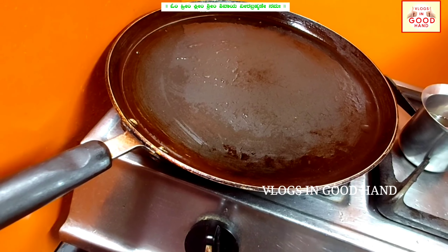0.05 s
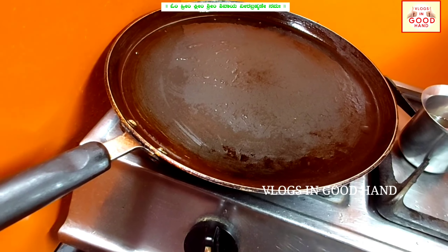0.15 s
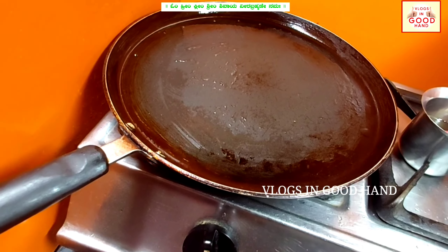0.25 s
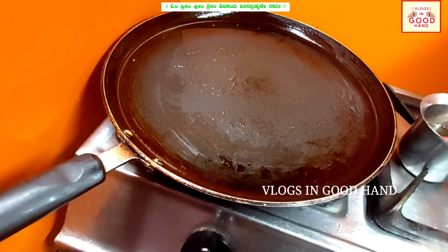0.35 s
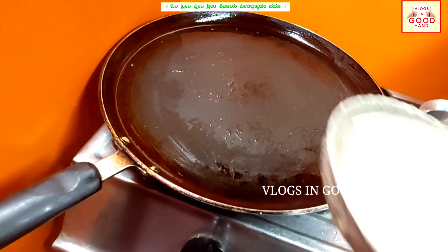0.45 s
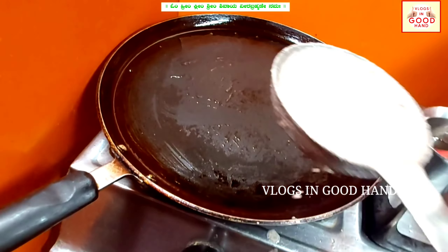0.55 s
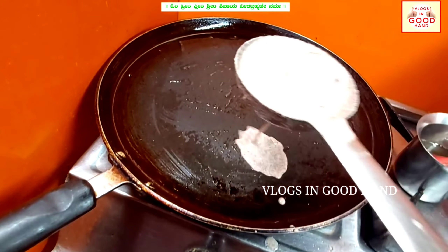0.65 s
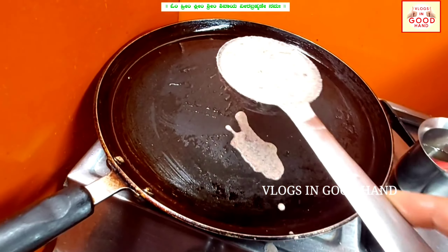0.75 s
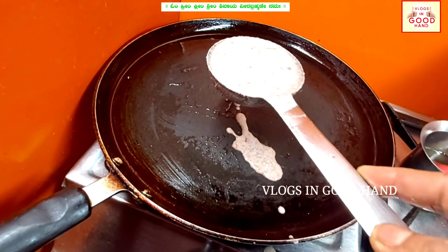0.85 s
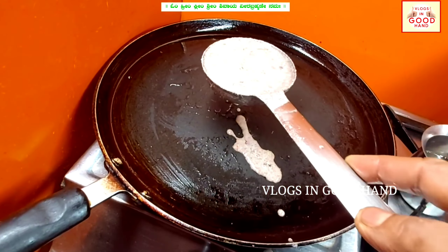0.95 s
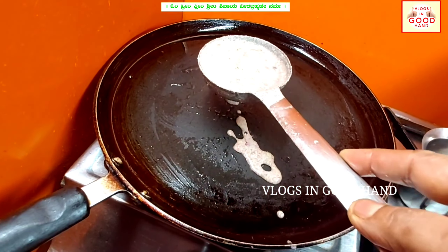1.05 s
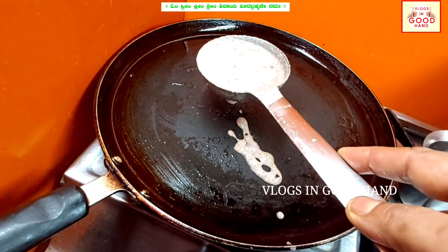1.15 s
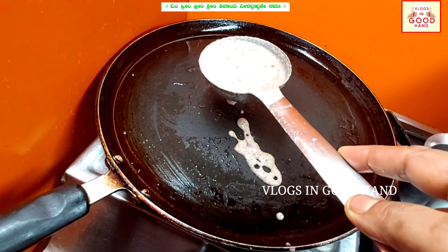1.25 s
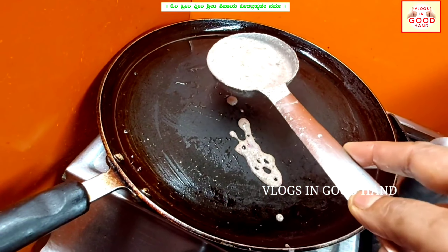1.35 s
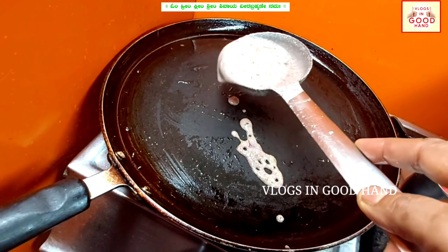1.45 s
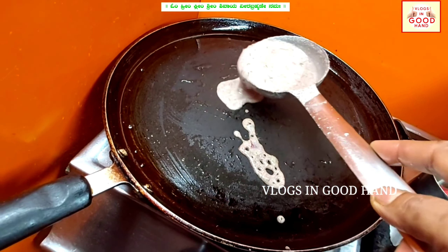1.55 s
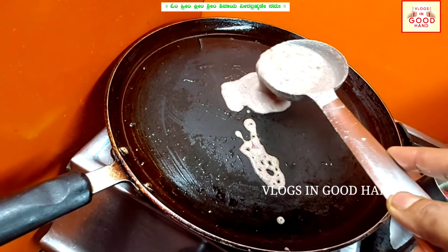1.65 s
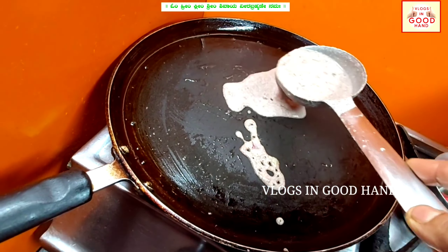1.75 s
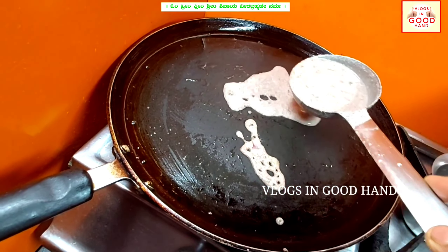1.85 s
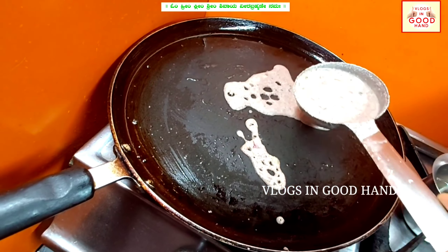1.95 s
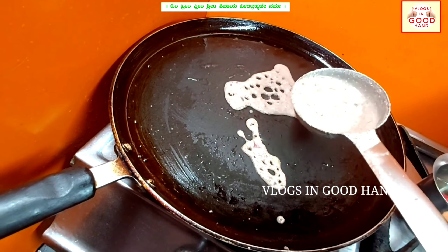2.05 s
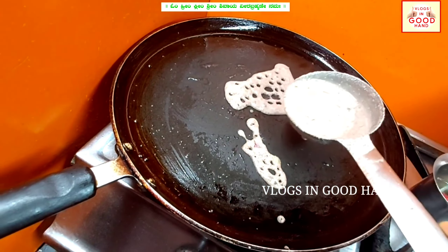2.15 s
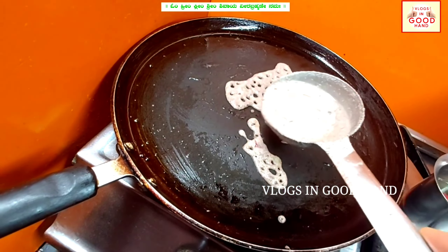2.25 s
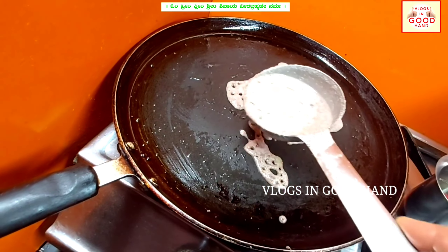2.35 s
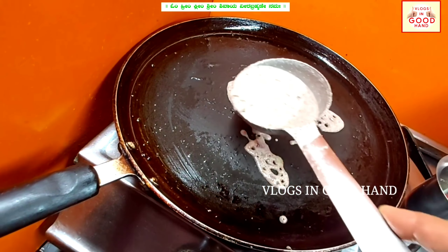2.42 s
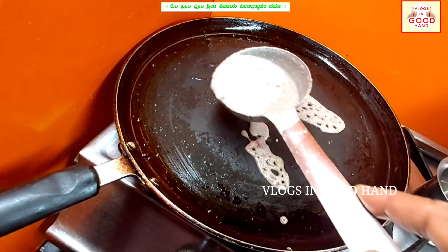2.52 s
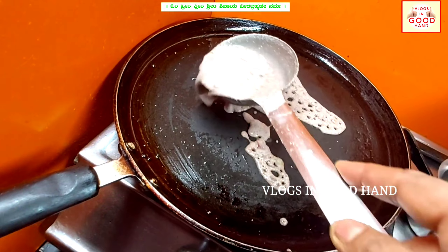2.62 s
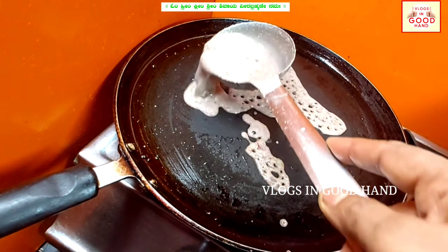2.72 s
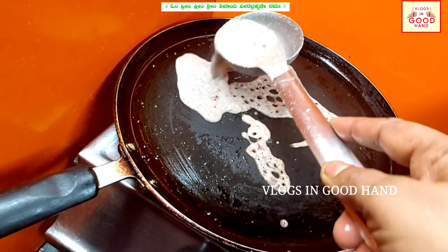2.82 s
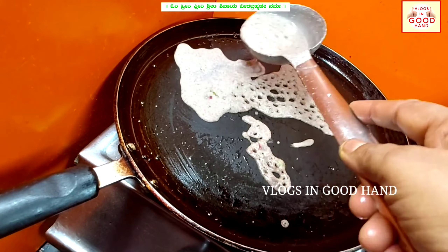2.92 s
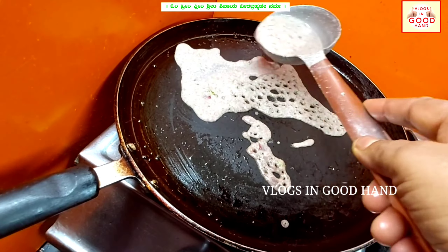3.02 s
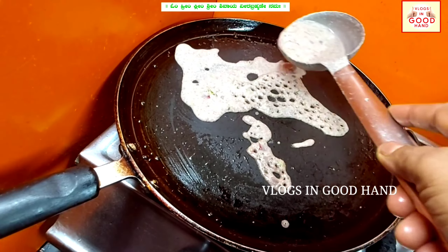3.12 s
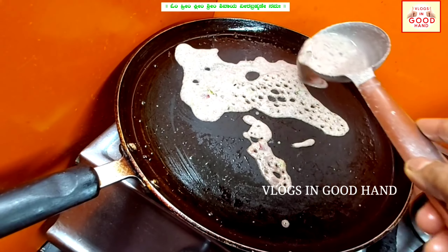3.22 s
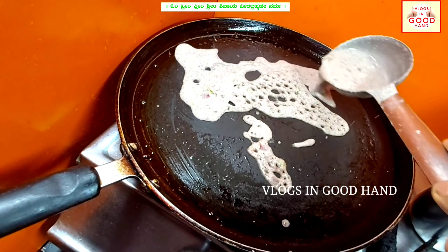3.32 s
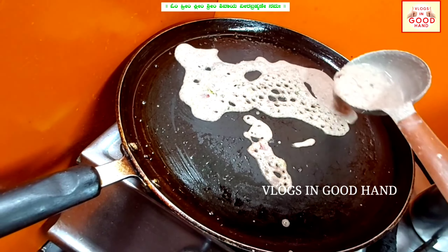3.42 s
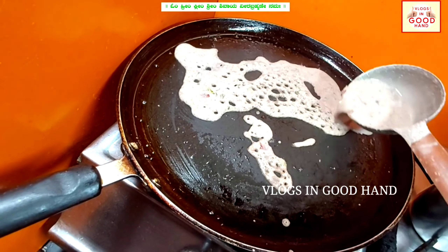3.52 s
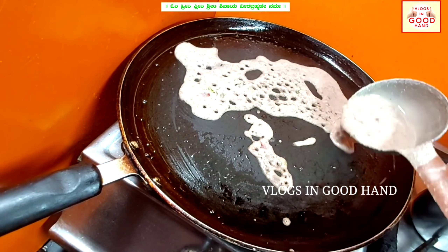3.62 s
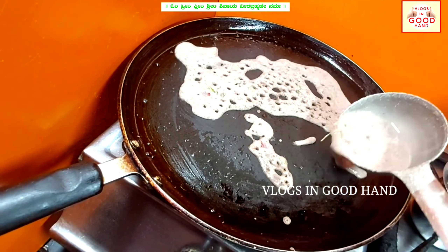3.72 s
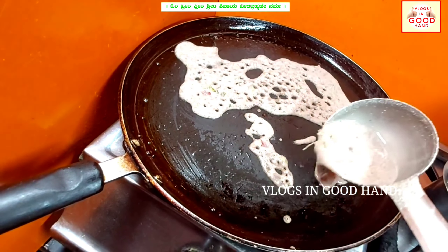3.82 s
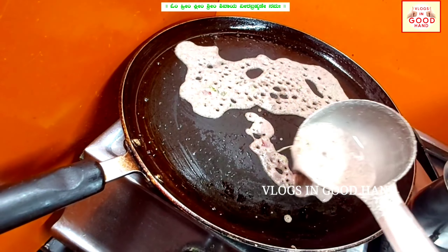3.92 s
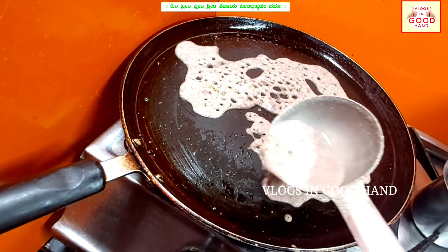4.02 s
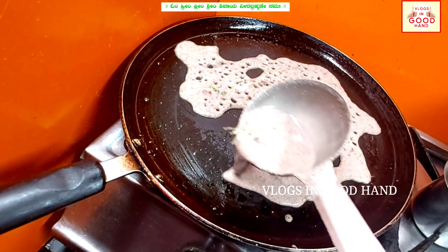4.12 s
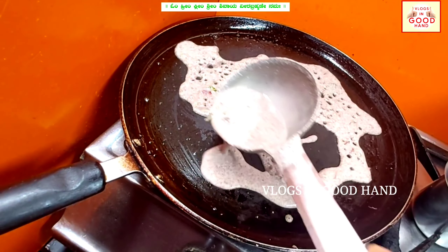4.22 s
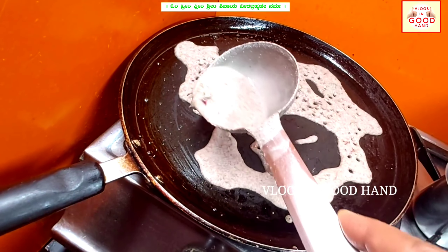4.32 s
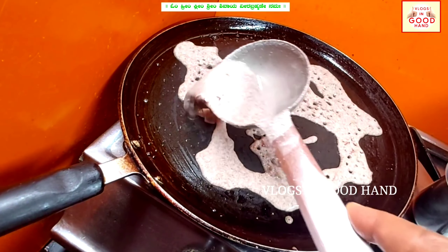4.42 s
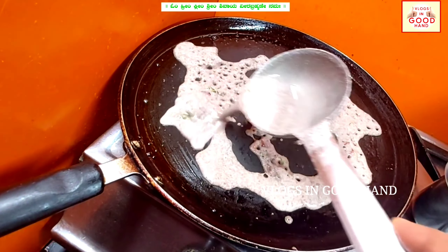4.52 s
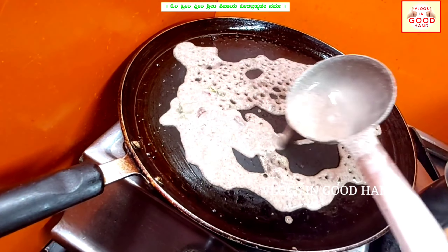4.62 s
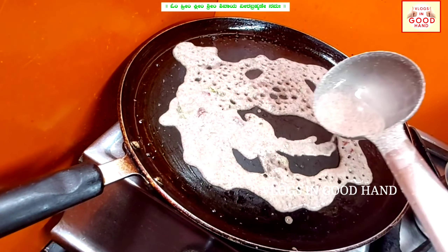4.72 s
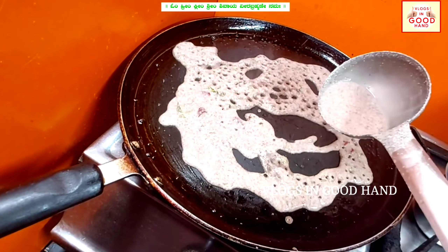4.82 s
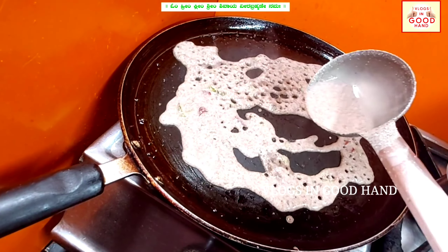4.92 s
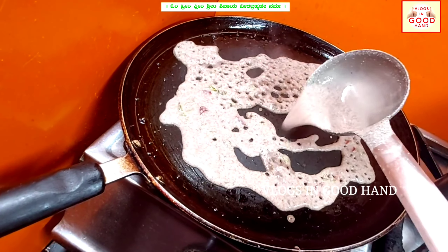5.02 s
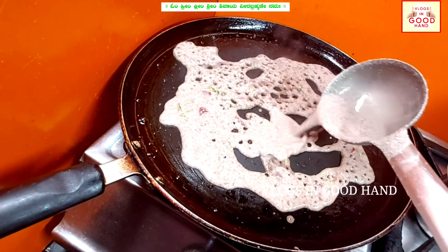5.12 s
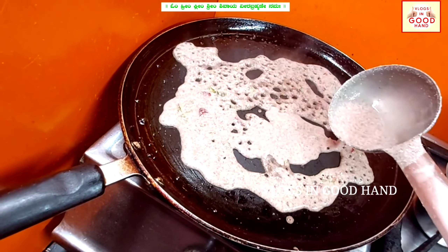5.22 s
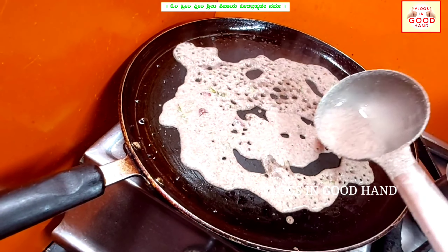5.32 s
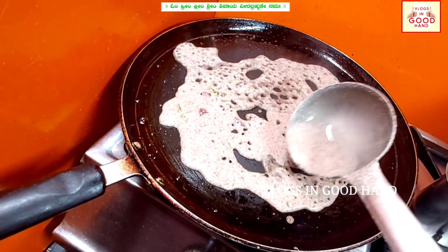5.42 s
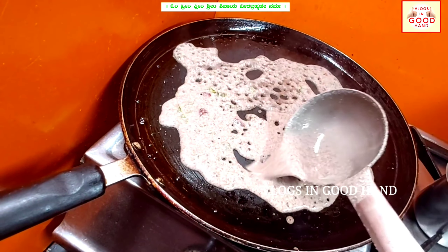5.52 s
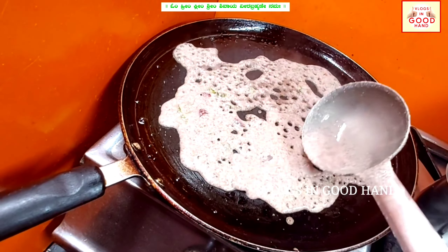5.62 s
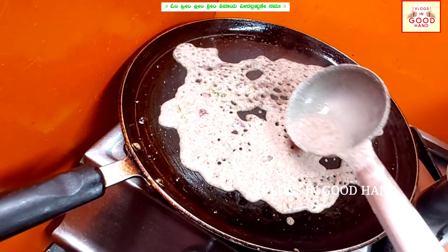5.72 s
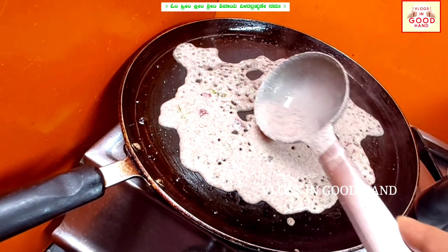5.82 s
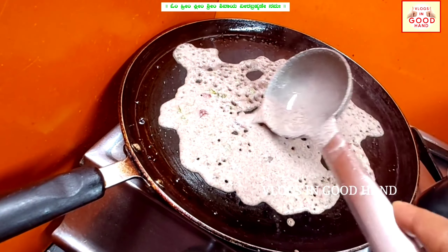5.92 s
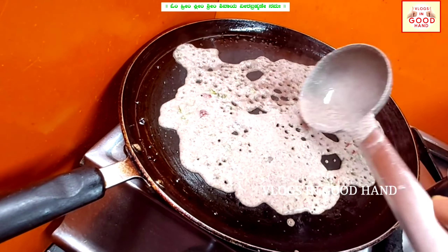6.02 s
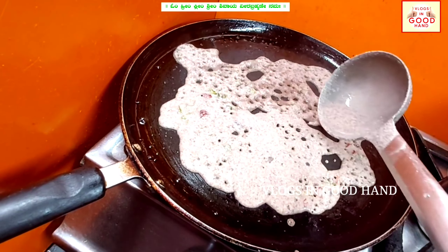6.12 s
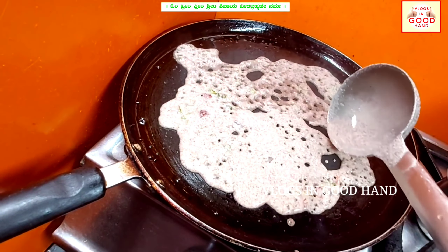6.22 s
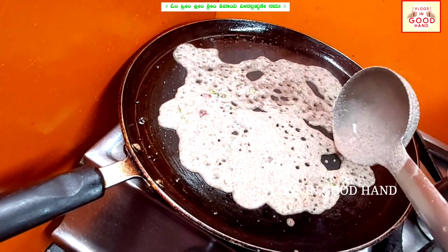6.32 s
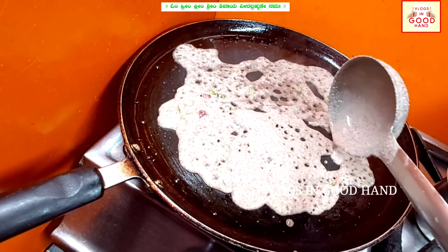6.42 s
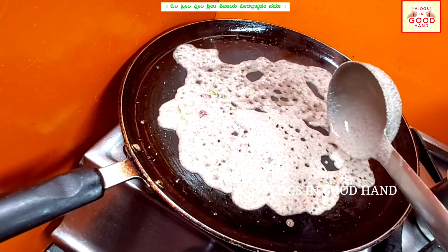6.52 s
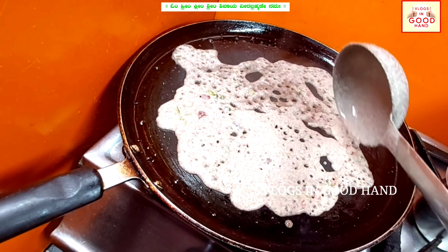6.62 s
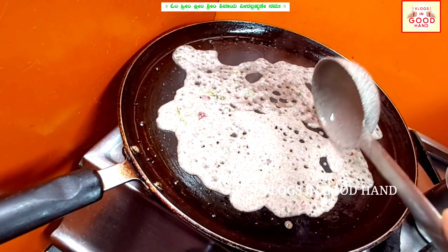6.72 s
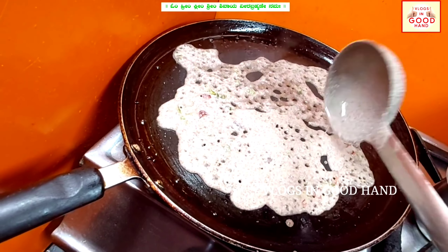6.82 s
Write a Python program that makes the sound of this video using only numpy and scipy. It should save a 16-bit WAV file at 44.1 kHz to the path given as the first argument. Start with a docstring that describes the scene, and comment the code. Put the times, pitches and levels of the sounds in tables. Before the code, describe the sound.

Close stereo frying sound in a small, quiet home kitchen. Near-silence first, then tiny drips tap the pan and batter sets off a sudden fierce sizzle. It eases and surges again as more is poured, with airy steam, fine crackling and faint wavering squeals from the metal. Soft thuddy pops and crisp treble ticks occur throughout. Later the boiling darkens and softens, but hissing and spitting continue to the end.

```python
"""Steam hisses from the pores of thin batter ladled onto a hot oiled griddle, near a two-port microphone.
The hiss is shaped noise in bursts; boiling adds a darkening band of noise, crackle and fuzzy pan whistles.
Fat spits as treble chirps; ultrasonic spits overload the microphone into short dull negative pops. Drips
knock on dry metal as decaying modes with splats of noise. A faint stir and a quiet kitchen lie behind."""
import sys
import numpy as np
from scipy import signal
from scipy.io import wavfile
from scipy.ndimage import uniform_filter1d

SR = 44100
rng = np.random.default_rng(int(sys.argv[2]) if len(sys.argv) > 2 else 0)


def digitize_waveform(pressure):
    """Quantize a signal to 16-bit integers and store it at the path in sys.argv[1].

    Rows of a 2-D input are taken as channels; values are limited to [-1, 1].
    """
    field = np.atleast_2d(pressure).T
    bounded = np.clip(field, -1, 1)
    quanta = np.round(bounded * 32767).astype(np.int16)
    wavfile.write(sys.argv[1], SR, quanta)


N = 302526
T = np.arange(N) / SR  # time in s

# Strength of the steam over time: time_s, level_db
STEAM_LEVEL = [(0.64, -48), (0.67, -42), (0.72, -39.5), (0.76, -28.5), (0.83, -24.5), (0.88, -27),
               (1.14, -23.5), (1.2, -26), (1.62, -29.5), (1.69, -28.5), (1.76, -25.5), (2.12, -24),
               (2.82, -27.5), (3.7, -24), (4.7, -26.5), (5.0, -25.5), (5.5, -25.5), (6.12, -28.5),
               (6.31, -27.5), (6.86, -27.5)]
# Strength of the boiling over time: time_s, level_db
BOIL_LEVEL = [(0.7, -57), (0.79, -43), (0.83, -25.5), (0.91, -23.5), (1.2, -34.5), (1.304, -31),
              (1.66, -35), (1.69, -33), (1.726, -25), (1.898, -24), (2.168, -28), (2.19, -33.5),
              (2.248, -29.5), (2.7, -33.5), (2.85, -30), (2.9, -29), (3.24, -24.5), (3.66, -26.5),
              (4.63, -27), (6.0, -30), (6.86, -33.5)]
# Spots where the stream of batter lands, each favouring its own whistles:
# start_s, freshness (0-1, share of bare hot metal), seven columns of whistle_db against the whistle drive
LANDING_SPOTS = [(0.78, 1, -18, -20, -16, -1, -18, -17, -6), (0.88, 0, -8, -12, -18, 0, -17, -21, -4.5),
                 (1.0, 0, -12, -16, -11, -1, -19, -16, -28),
                 (1.12, 0.063, -12, -16, -18, -7, -17, -16, -10),
                 (1.24, 0.14, -13, -20, -11, -1, -25, -24, -1.5),
                 (1.46, 0.091, -13, -16, -11, -8, -10, -16, -13),
                 (1.69, 0.56, -10, -8, -14, -19, -2, -7, -3), (1.81, 0.15, -12, -8, -10, -16, -1, -10, -5),
                 (1.95, 0, -2, -7, -9, -12, -4, -9, -14), (2.07, 0, -11, -9, -8, -24, -1, -12, -14),
                 (2.19, 0, -20, -15, -17, -22, -18, -16, -20), (2.89, 0.4, -9, -10, -3, -25, -5, -9, -14),
                 (3.2, 0, -14, -7, -10, -14, -9, -13, -12), (3.42, 0.018, -14, -14, -2, -15, -6, -1, -13),
                 (3.65, 0.04, -9, -13, -2, -13, -3, -2, -12), (3.9, 0, -10, -9, -5, -16, -4, -7, -10),
                 (4.3, 0, -12, -8, -5, -19, -8, -9, -8), (4.62, 0, -9, -15, -10, -20, -12, -25, -13),
                 (5.1, 0.073, -13, -30, -16, -18, -30, -22, -15)]

DULLING_DB_PER_S = -1.21  # per octave: the boiling darkens as the crepe thickens
DULLEST_S = 5.2  # the darkening stops once the pan is covered


def amp(db):
    """Decibel law: 20 dB is a factor of ten in pressure."""
    return 10 ** (np.asarray(db) / 20)


def evened(x):
    """Normalisation to unit rms, the root of the mean power."""
    return x / np.sqrt(np.mean(x ** 2) + 1e-20)


def over_time(rows, t=T):
    """Linear interpolation of each column of a curve table at the times t."""
    s, *columns = np.transpose(rows)
    return [np.interp(t, s, c) for c in columns]


def over_hz(rows, hz):
    """Interpolation of each column of a spectrum table, straight on a log-frequency axis."""
    f, *columns = np.transpose(rows)
    return np.array([np.interp(np.log(hz + 1), np.log(f + 1), c) for c in columns])


def octaves(hz, pivot_hz, low, high):
    """Logarithmic pitch distance from a pivot, held between two limits."""
    return np.clip(np.log2((hz + 1) / pivot_hz), low, high)


def level(level_db, start, pan_db=0 * T, rise_s=.0027):
    """Level panning: half the left-right difference goes to each port; silent before the start."""
    fade = np.clip((T - start) / rise_s, 0, 1)
    return fade * amp(level_db + np.array([pan_db, -pan_db]) / 2)


def noise(colour, size, patchy_db, bump_db=lambda hz, t: 0):
    """Partly coherent two-port noise from random short-time spectra with drifting patches."""
    # Coherence of the ports: pitch_hz, likeness (0-1), left_lead_rad
    coherence = [(60, 0.33, 0.65), (300, 0.68, -0.56), (814, 0.78, 0.4), (1130, 0.17, -0.25),
                 (1290, 0.61, -0.56), (1650, 0.25, -2.4), (1930, 1, -1.33), (2170, 0.22, -1.3),
                 (3630, 0.072, -1.6), (4260, 0.53, 0.73), (4700, 0.051, 1), (9200, 0, 0.17)]
    hop = size // 4
    frames, hz = N // hop + 5, np.fft.rfftfreq(size, 1 / SR)
    a, b, c, d, patches = rng.standard_normal((frames, len(hz), 5)).T

    # smoothed across 400 Hz and 60 ms
    wide, long = max(round(400 * size / SR), 1), max(round(.06 * SR / hop), 1)
    patches = evened(uniform_filter1d(uniform_filter1d(patches, wide, 0), long, 1))

    same, lead = over_hz(coherence, hz)[:, :, None]
    same = np.clip(same, 0, 1)
    left = a + 1j * b
    right = same * left * np.exp(-1j * lead) + np.sqrt(1 - same ** 2) * (c + 1j * d)
    field_db = patchy_db * patches + bump_db(hz[:, None], np.arange(frames) * hop / SR)
    spectra = np.array([left, right]) * amp(over_hz(colour, hz)[:, :, None] + field_db)
    out = signal.istft(spectra, nperseg=size, noverlap=size - hop)[1][:, :N]
    # centre rms 1 over half a second: slow level belongs to the curves
    return out / np.sqrt(uniform_filter1d(out.mean(0) ** 2, SR // 2))


def bursts(per_s, spread_db, decay_s, depth):
    """Shot-noise flicker of loudness: random rises die away over a steady base; mean power 1."""
    size = amp(spread_db * np.minimum(rng.exponential(1, N), 5))
    rises = size * (rng.random(N) < per_s / SR)
    r = np.exp(-1 / (decay_s * SR))
    return evened(1 + depth * signal.lfilter([1], [1, -r], rises))


def strike(rows, shape):
    """Superposition: one pulse shape convolved with impulses at each row's time and port levels."""
    train = np.zeros((2, N))
    for s, *db in rows:
        train[:, min(round(s * SR), N - 1)] += amp(db)
    return signal.oaconvolve(train, shape[None], axes=1)[:, :N]


def resonate(x, modes, drift_db=0.):
    """Modal resonance: a sum of pan modes, each wandering slowly in strength."""
    out = np.zeros((2, N))
    coarse_t = T[::256]
    for hz, width, left_db, right_db in modes:
        rates, phases = np.geomspace(1.5, 12, num=12)[:, None], rng.random((12, 1))
        waves = np.sin(2 * np.pi * (rates * coarse_t + phases))
        drift = evened(np.sum(waves / np.sqrt(rates), 0))
        b, a = signal.iirpeak(hz, hz / max(width, 5), SR)
        gain = np.interp(T, coarse_t, amp(drift_db * drift)) * amp([[left_db], [right_db]])
        out += gain * signal.lfilter(b, a, x)
    return out


def hiss():
    """Turbulent jets: steam leaves the pores as bright noise, sputtering in fast and slower bursts."""
    # Spectrum of the jets: pitch_hz, left_db, right_db
    colour = [(600, -24, -28), (1500, -10, -16), (3000, -6, -10), (4800, -9, -9), (5400, -7, -8),
              (5750, -9, -8), (6000, -6.5, -7), (6500, -11, -12), (7000, -7.5, -8), (8000, -6, -6.5),
              (9400, -4, -10), (11500, -2, -6.5), (13500, 0, -8), (15100, 0, -11), (15500, -1, -15)]
    # Left-right balance of the hiss: time_s, left_over_right_db
    balance = [(.65, 7), (.8, -1), (1.6, 0), (1.75, -5.5), (2.15, -1.5), (2.3, -0.5), (3.8, -2.5), (5.4, 0),
               (6.86, 0)]
    thin_db, thin_s = -11, 0.029  # the first jets are all treble

    def thinness(hz, t):
        fading = np.exp(-np.maximum(t - .66, 0) / thin_s)
        return thin_db * fading * np.clip(np.log2(9000 / (hz + 1)), 0, 1)

    sputter = bursts(per_s=160, spread_db=-16.0, decay_s=0.00067, depth=0.1)
    sputter *= bursts(per_s=8.2, spread_db=1.9, decay_s=0.014, depth=0.31)
    jets = noise(colour, size=256, patchy_db=2.0, bump_db=thinness)
    gain = level(over_time(STEAM_LEVEL)[0], .657, over_time(balance)[0], rise_s=.009)
    return jets * sputter * gain


def boil():
    """Bubble resonance: growing bubbles sound lower, so their band darkens; the pan rings with them."""
    # Spectrum of the bubbles: pitch_hz, left_db, right_db
    colour = [(509, -40, -32.5), (1106, -10.5, -19), (1260, -25, -25), (1410, -7.5, -12),
              (3390, -0.5, -11.5), (3880, -9.5, -10), (4400, -9.5, -6), (4670, -13, -16), (4560, -5, -7),
              (6050, -19.5, -10.5), (9100, -15, -69), (15000, -36, -36)]
    # Weaker pan modes under the batter: pitch_hz, width_hz, left_db, right_db
    pan_modes = [(975, 50, -4, -4), (1100, 70, -3, -3), (1420, 60, -6, 0), (1480, 110, -2, -8),
                 (1600, 60, -2, -6), (1770, 70, -2, 0), (2050, 80, -4, -4), (2330, 60, -2, -8),
                 (2700, 60, -3, -8), (2820, 70, -3, -8), (3740, 90, 0, -6), (3840, 70, 0, -6),
                 (4140, 50, -3, -7), (4220, 60, -5, -8), (4350, 60, -2, -6), (4715, 50, -5, -5),
                 (5930, 100, -6, -6), (6105, 70, -6, -7)]
    fresh_db, fresh_s = 26, 0.062  # tiny bright bubbles on bare metal (per octave), and how soon they grow
    bright_db = 2.5  # starting tilt per octave
    ring_db, damping_db_per_s = 2, -0.6  # share heard through the pan; spreading batter damps it
    crackle_db, left_over_right_db = -7.5, 2.5

    def bubble_tilt(hz, t):
        fresh = sum(share * np.exp(-abs(t - s) / fresh_s) * (t > s)
                    for s, share, *_ in LANDING_SPOTS)
        db_per_octave = bright_db + DULLING_DB_PER_S * np.minimum(t, DULLEST_S) + fresh_db * fresh
        return db_per_octave * octaves(hz, 3000, -1.2, .6)

    bubbles = noise(colour, size=512, patchy_db=1.5, bump_db=bubble_tilt)
    bubbles *= bursts(per_s=340, spread_db=-4.0, decay_s=0.015, depth=0.18)
    bubbles *= bursts(per_s=900, spread_db=2.5, decay_s=0.00061, depth=0.24)
    bubbles += amp(crackle_db) * crackle()
    ring = amp(ring_db + damping_db_per_s * T) * resonate(bubbles, pan_modes, drift_db=2.5)
    both = bubbles + ring
    both /= np.sqrt(uniform_filter1d(both.mean(0) ** 2, SR // 4))
    return both * level(over_time(BOIL_LEVEL)[0], 0.662, left_over_right_db + 0 * T)


def crackle():
    """Impulse response: each tiny bubble snaps as a click that rings for two or three cycles."""
    # Tiny bubbles by size: pitch_hz, filter_width_hz, left_db, right_db
    bubble_sizes = [(1626, 890, -7.5, -13.5), (2450, 1150, 0, -7), (3530, 1230, 0.5, -8),
                    (4370, 2000, -5, -8.5)]
    snaps_per_s, spread_db = 300, 3.5  # for each size
    out = np.zeros((2, N))
    for hz, width, *db in bubble_sizes:
        size, chance, sign = rng.random((N, 3)).T
        strength = amp(-spread_db * np.log(size + 0.016))
        snaps = strength * (chance < snaps_per_s / SR) * np.sign(sign - .5)
        ring = signal.iirpeak(hz, hz / width, SR)
        ringing = evened(signal.lfilter(*ring, signal.lfilter(*ring, snaps)))
        dulling_db = DULLING_DB_PER_S * (np.minimum(T, DULLEST_S) - T.mean())
        out += amp(db)[:, None] * amp(dulling_db * np.log2(hz / 2500)) * ringing
    out[0] = np.roll(out[0], 7)  # the sound reaches the right port first, by 7 samples
    return out / np.std(out.mean(0))


def singing():
    """Forced resonance: rattling bubbles drive the strongest pan modes into whistles that follow the boil."""
    # Seven whistles, each a list of one or two modes: pitch_hz, width_hz, left_db, right_db
    whistles = [
        [(2402, 30, 0, -16)],
        [(3070, 45, 0, -17)],
        [(3125, 50, -1, -18), (3180, 45, -1, -17)],
        [(3435, 28, 0, -11)],
        [(3503, 28, 0, -14)],
        [(3870, 45, 0, -12), (3935, 45, 0, -12)],
        [(3992, 32, 0, -7)],
    ]
    swing, middle_db = 0.96, -45.5  # dB of whistle per dB of boiling, about this level
    fade_db_per_s = -3.5  # wet batter settling on a spot chokes its whistles
    move_s = .06  # time to shift from one spot to the next

    rattle = noise([(500, 0, 0), (8000, 0, 0)], size=512, patchy_db=0.5)
    rattle *= bursts(per_s=120, spread_db=3.0, decay_s=0.0037, depth=0.14)
    starts, _, *spot_db = np.transpose(LANDING_SPOTS)
    spot = np.maximum(np.searchsorted(starts, T) - 1, 0)
    settling_db = fade_db_per_s * np.maximum(T - starts[spot], 0)
    drive_db = middle_db + swing * (over_time(BOIL_LEVEL)[0] - middle_db)
    out = np.zeros((2, N))
    for modes, db in zip(whistles, spot_db):
        tone = resonate(rattle, modes, drift_db=2.0)
        moved_db = uniform_filter1d(db[spot] + settling_db, max(round(move_s * SR), 1))
        out += tone / np.std(tone.mean(0)) * level(drive_db + moved_db, .78)
    return out


def pops():
    """Square-law rectification: spits too high to hear leave dull negative pulses, over low bubbling noise."""
    # Loud pops at the microphone, levels before the high-pass: time_s, left_db, right_db
    loud_pops = [(0.765, -28, -43), (0.7828, -20, -40), (0.7904, -22, -36), (0.8041, -19, -24),
                 (0.8393, -20, -38), (0.8686, -10.5, -30), (0.9281, -14, -28), (0.9523, -13, -36),
                 (0.9746, -13, -37), (1.0204, -13, -36), (1.0812, -7, -38), (1.1089, -21, -38),
                 (1.1569, -24, -29), (1.167, -12, -36), (1.1939, -14, -40), (1.2038, -12, -35),
                 (1.2114, -13, -30), (1.2237, -17, -36), (1.2682, -17, -34), (1.3511, -17.5, -37),
                 (1.3679, -18, -37), (1.5005, -18, -36), (1.6341, -13, -37), (1.6517, -22, -15.5),
                 (1.9477, -20, -34), (2.0423, -14, -35), (2.1801, -11.5, -38), (2.2876, -9, -39),
                 (2.3323, -15, -38), (2.3835, -14.5, -36), (2.4818, -15, -37), (2.6687, -16, -28),
                 (2.788, -24, -20), (2.8819, -17, -38), (2.9083, -21, -38), (3.3349, -17, -36),
                 (3.392, -18, -26), (3.4196, -12.5, -28), (3.4966, -20, -34), (3.5617, -19, -21),
                 (3.8857, -18, -36), (3.9058, -14.5, -26), (4.0401, -14, -32), (4.0764, -16, -32),
                 (4.0914, -20, -20), (4.1389, -20, -34), (4.1736, -18, -34), (4.3247, -12.5, -34),
                 (4.5014, -16, -28), (4.6329, -17, -35), (4.8009, -11, -34), (4.9351, -13.5, -32),
                 (5.1757, -19, -34), (5.5252, -15, -57), (5.5804, -19, -34), (5.7498, -19, -24),
                 (5.7795, -16, -28), (6.454, -18, -31), (6.5132, -14.5, -32), (6.726, -14.5, -37),
                 (6.7699, -16.5, -41), (6.8399, -18, -41)]
    # Strength of the low bubbling: time_s, level_db (before the gains below)
    simmer_level = [(0.72, -63), (0.96, -43.5), (1.15, -43.5), (1.65, -50), (2.21, -43), (2.85, -50),
                    (3.35, -44.5), (3.85, -45.5), (5.1, -41.5), (5.9, -44), (6.1, -45.5), (6.86, -45.5)]
    # Spectrum of the low bubbling: pitch_hz, left_db, right_db
    colour = [(20, -37, -33), (60, -30, -32), (120, -2.5, -37), (314, 6.5, -1), (405, -1, -3.5),
              (815, 5.5, 0.5), (1176, 10.5, -5), (2500, -69, -58)]
    # Tilt of the low bubbling, boomy at first and lighter later: time_s, tilt_db_per_octave
    tilt_curve = [(1.1, -9), (1.6, -1), (2.5, -6), (3.4, 6), (5.0, -1), (5.9, 4), (6.0, 12), (6.86, 12)]

    t = np.arange(-20, 300) / SR
    pulse = -np.exp(-.5 * (t / .00009) ** 2)
    rebound = 0.16 * np.exp(-np.maximum(t, 0) / 0.0049) * (t > .0002)
    shape = pulse + rebound
    db = over_time(simmer_level)[0]

    def tilt(hz, t):
        return over_time(tilt_curve, t)[0] * octaves(hz, 200, -2.5, .6)

    # small pops at random, 220 a second at each port
    size = amp(3.16 * np.minimum(rng.exponential(1, (N, 2)), 4)).T
    small = size * (rng.random((N, 2)).T < 220 / SR)
    small = signal.oaconvolve(small, shape[None], axes=1)[:, :N] * amp([[11.0], [3.0]])
    small[1] += 0.15 * small[0]  # the far port hears the near pops faintly
    late_fade_db = -4 * np.clip((T - 5.8) / .2, 0, 1)  # the small pops weaken near the end

    loud = np.roll(strike(loud_pops, shape), -20, 1)  # centres the pulses on their times
    all_pops = loud + small * level(db + late_fade_db, 0.7)
    low = noise(colour, size=1024, patchy_db=1.5, bump_db=tilt) * amp(2.5)
    return signal.lfilter(*signal.butter(1, 120, "high", fs=SR), all_pops) + low * level(db, 0.8)


def spits():
    """Flash evaporation: a droplet of fat gives a few treble cycles and a short fizzy tail."""
    # Large spits: time_s, left_db (of the chirp)
    large_spits = [(0.601, -32), (0.6645, -30), (0.76, -15), (1.3308, -8), (1.6517, -8), (1.836, -11),
                   (2.9598, -13), (3.4961, -10), (3.7469, -18), (4.1734, -12), (5.5249, -11), (5.5635, -6),
                   (5.8008, -11), (5.8928, -11), (6.0075, -9), (6.1036, -13), (6.1868, -10), (6.3322, -10),
                   (6.5785, -11), (6.7258, -10), (6.7861, -10), (6.841, -10)]
    right_db = -15  # the right port against the left, for the large spits
    t = np.arange(600) / SR
    chirp = np.sin(2 * np.pi * 12300 * t) * np.exp(-.5 * ((t - .0004) / .0001) ** 2)
    tail = 0.14 * np.diff(rng.standard_normal(601)) * np.exp(-t / 0.0052) * (t > .0004)

    # small spits at random, 60 a second
    size, chance, sign = rng.random((N, 3)).T
    small = amp(14.0 * size ** 2) * (chance < 60 / SR) * np.sign(sign - .5)
    small = signal.oaconvolve(small, chirp + .5 * tail)[:N] * amp([[1.0], [-11.5]])

    large = strike([(s, db, db + right_db) for s, db in large_spits], chirp + tail)
    large = np.roll(large, -18, 1)  # centres the chirps on their times
    return large + small * level(over_time(STEAM_LEVEL)[0], 0.66)


def drips():
    """Modal decay: soft wet knocks, a dull splat of noise with a brief, weak ring of the dry pan."""
    # Knocks on the pan, the third soon after the second: start_s, level_db (before the port gains),
    # pitch_factor, brightness_db_per_octave
    knocks = [(0.581, -48, 0.95, -1.5), (.601, -41.5, 0.94, 0.3), (0.6217, -53, 0.97, -1.5),
              (0.678, -47, .78, 1)]
    # Modes of the dry pan: pitch_hz (before the pitch factor), level_db, t60_s
    dry_modes = [(180, -6, .1), (306, -10, 0.18), (549, -28, 0.072), (1153, -8.5, 0.074),
                 (2150, -0.5, 0.04), (2700, -9, 0.069)]
    out, t = np.zeros((2, N)), np.arange(8000) / SR
    for s, db, pitch, bright_db in knocks:
        ring = np.zeros(len(t))
        for hz, mode_db, t60 in dry_modes:
            envelope = amp(mode_db + bright_db * np.log2(hz / 1000) - 60 * t / t60)
            ring += envelope * np.sin(2 * np.pi * hz * pitch * t)
        splat = signal.lfilter(*signal.butter(2, 3200, fs=SR), rng.standard_normal((len(t), 2)).T)
        sound = ring + 0.76 * splat * amp(-60 * t / 0.17)
        onset = np.minimum(t / 0.0007, 1)
        out[:, round(s * SR):][:, :len(t)] += amp(db) * onset * sound
    return out * amp([[2.0], [-5.0]])


def rustle():
    """Band-limited noise: a faint low stir of movement just before the pour."""
    band = signal.butter(2, [350, 620], "band", fs=SR)
    stir = signal.lfilter(*band, rng.standard_normal((N, 2)).T)
    swell = np.exp(-.5 * ((T - .422) / 0.013) ** 2)
    swell += .3 * np.exp(-.5 * ((T - .52) / 0.076) ** 2)
    return evened(stir) * swell * amp([[-69.0], [-74.0]])


def kitchen():
    """Stationary background noise: the quiet room at a steady level."""
    # Spectrum of the room: pitch_hz, left_db, right_db
    colour = [(18, -30, -34), (30, -10, -2), (92, 5, -2), (225, -10, -17), (315, -9, -18), (728, -22, -27),
              (2830, -22, -28), (5890, -33, -31), (6400, -25, -26), (9680, -24, -29), (11000, -13, -23),
              (15500, -28, -36)]
    return amp(-69.5) * noise(colour, size=2048, patchy_db=2.0)


def scene():
    """Linear superposition of all the sources."""
    return hiss() + boil() + singing() + pops() + spits() + drips() + rustle() + kitchen()


def record(dry):
    """Band limitation: the microphone drops the deepest bass, the recorder the top treble."""
    edge_hz = 15470
    lean = signal.lfilter(*signal.butter(2, 45, "high", fs=SR), dry)
    low_pass = signal.firwin(1023, edge_hz, window=("kaiser", 9), fs=SR)
    return signal.oaconvolve(lean, low_pass[None], "same")


dry = scene()
out = record(dry)
digitize_waveform(out)
```